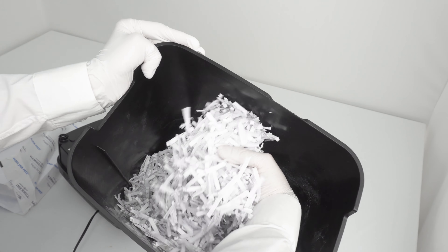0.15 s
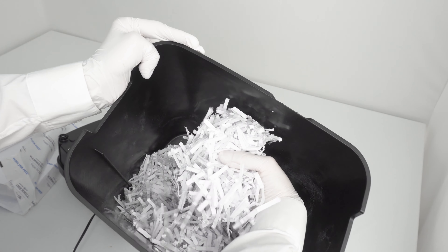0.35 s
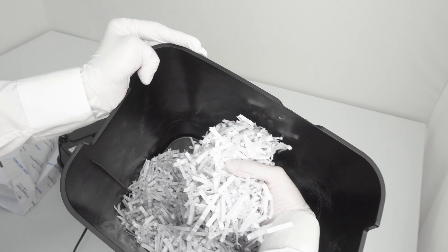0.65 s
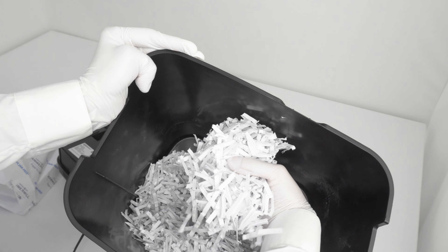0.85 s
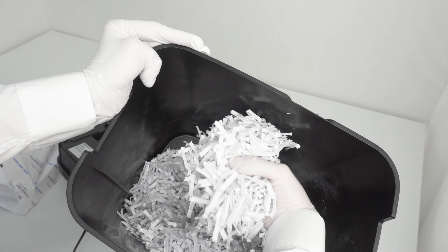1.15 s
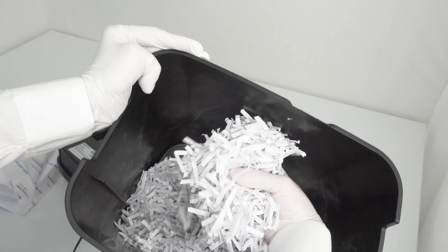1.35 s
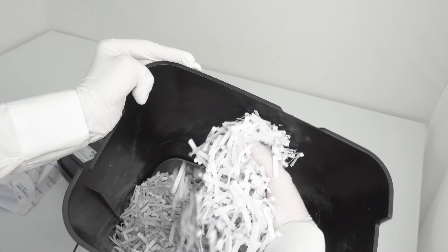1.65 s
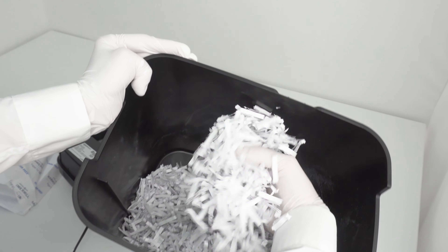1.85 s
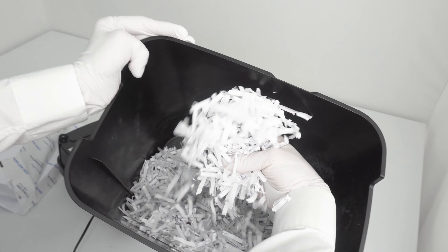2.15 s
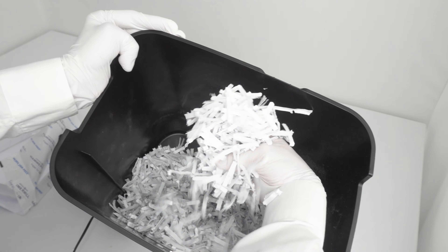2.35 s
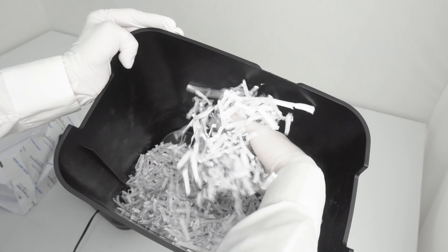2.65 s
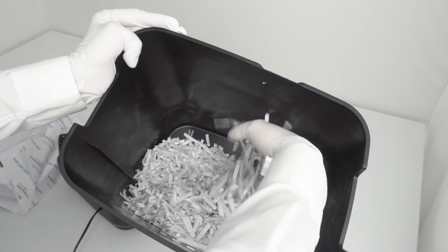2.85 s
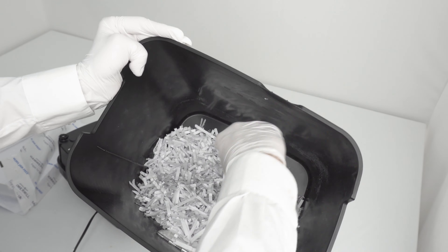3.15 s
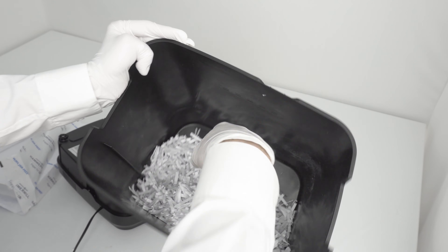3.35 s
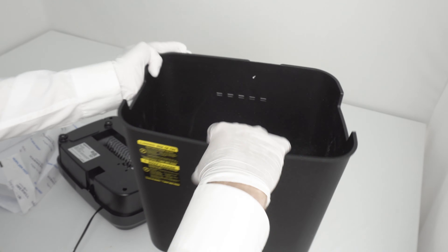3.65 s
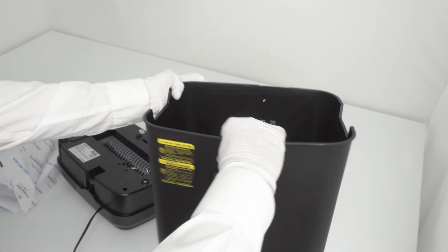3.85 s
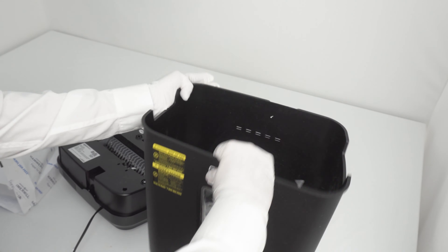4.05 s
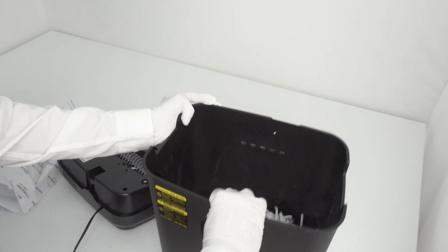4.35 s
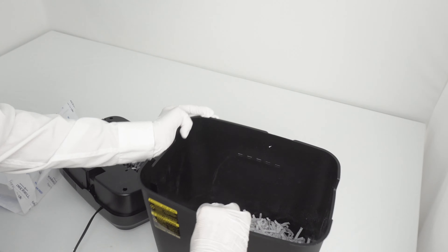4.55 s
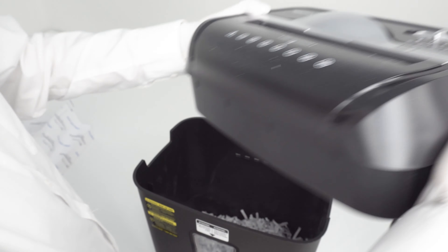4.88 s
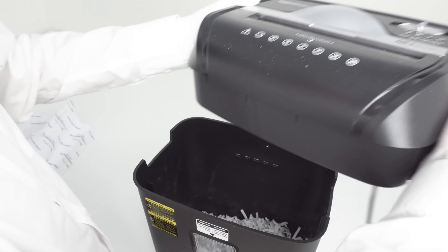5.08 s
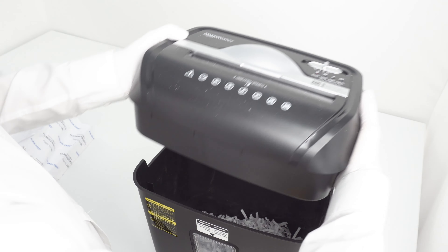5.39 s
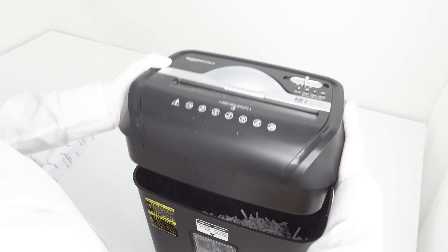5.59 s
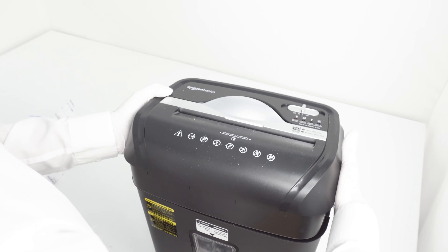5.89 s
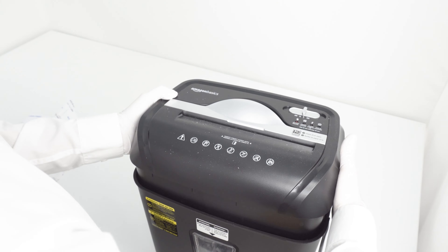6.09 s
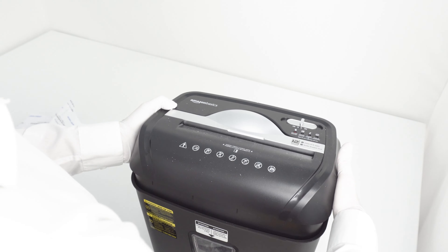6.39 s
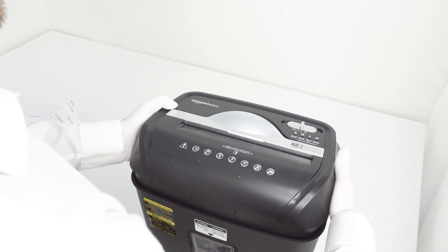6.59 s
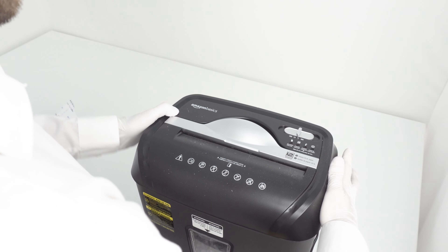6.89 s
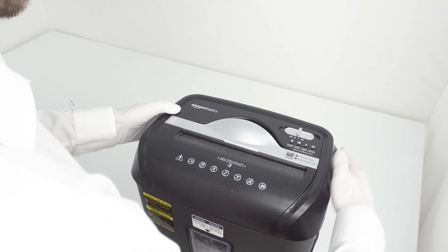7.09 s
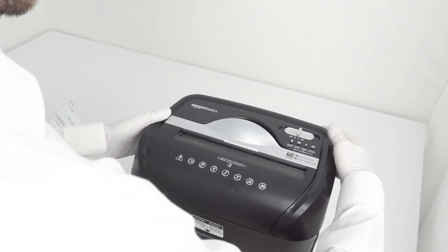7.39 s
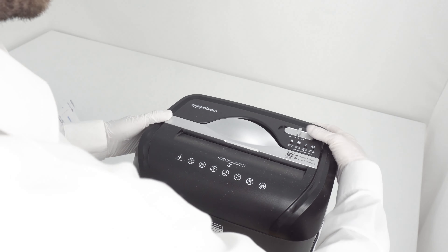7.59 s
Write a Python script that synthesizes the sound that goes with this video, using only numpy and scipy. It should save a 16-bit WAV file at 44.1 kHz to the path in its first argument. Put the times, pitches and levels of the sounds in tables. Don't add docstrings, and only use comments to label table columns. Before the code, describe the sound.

Bright, dry paper crackle comes in flurries inside a hollow plastic bin, with small ticks and dull knuckle knocks. After about four seconds the shreds slide in a louder rush, rims clack, plastic creaks and the bin thumps down. A heavy plastic unit is fitted on top in clusters of low knocks and short rubs, ending in a firm snap. Close miking, short bright room ring, faint hiss.

```python
import sys
import numpy as np
from scipy import signal
from scipy.fft import rfft, irfft, next_fast_len
from scipy.io import wavfile
from scipy.ndimage import uniform_filter1d

SR = 44100
rng = np.random.default_rng(int(sys.argv[2]) if len(sys.argv) > 2 else 0)


def boost_factor(decibels):
    exponent = np.asarray(decibels, float) / 20
    return 10 ** exponent


def output_pcm(signal):
    pcm = np.clip(np.atleast_2d(signal).T, -1, 1) * 32767
    wavfile.write(sys.argv[1], SR, np.round(pcm).astype(np.int16))


N = 340893
TIME = np.arange(N) / SR

# frequency in Hz, level in dB, t60 in seconds.
BIN_MODES = [(184.5, -3, 0.15), (199, -2.5, 0.32), (237, 3, 0.12), (280, 4.5, 0.099), (300, 4, 0.031),
             (342, -0.5, 0.084), (372, 1, 0.086), (416.5, 2, 0.069), (474, -1, 0.064), (551, -4, 0.073),
             (596, -3, 0.068), (668, -1.5, 0.072), (786, -10.5, 0.092), (834, -11, 0.092)]
# frequency in Hz, level in dB, t60 in seconds.
TABLE_MODES = [(39.9, -1.5, 0.5), (65.9, 11, 0.23), (102.7, 7.5, 0.17), (125.2, 13.5, 0.14)]


def unit(x):
    return x / np.sqrt(np.mean(x ** 2))


def colour(x, curve, share=1):
    hz, db = np.transpose(curve)
    length = x.shape[-1]
    size = next_fast_len(length)
    bins = np.log(np.arange(size // 2 + 1) * SR / size + 1)
    gain = boost_factor(share * np.interp(bins, np.log(hz), db))
    return irfft(rfft(x, size) * gain, size)[..., :length]


def band(x, lo_hz, hi_hz, order=2):
    return signal.sosfilt(signal.butter(order, [lo_hz, hi_hz], "band", fs=SR, output="sos"), x)


def walk(rate):
    hold = int(SR / rate)
    levels = rng.standard_normal(N // hold + 1)
    return uniform_filter1d(np.repeat(levels, hold), hold)[:N]


def rings(modes, size=22050):
    hz, db, t60 = np.transpose(modes)[:, :, None]
    t = TIME[:size]
    return boost_factor(db - 60 * t / t60) * np.sin(2 * np.pi * hz * t)


def add(out, s, x):
    i = int(s * SR)
    out[..., i:i + x.shape[-1]] += x[..., :N - i]


def add_peak(out, s, db, x):
    add(out, s, boost_factor(db) * x / abs(x).max())


def spread(mid, side, db, share=0.55):
    # frequency in Hz, side minus mid in dB.
    width = [(60, -23), (110, -21), (380, -15), (700, -9), (1290, -8), (4400, -5), (8120, -4), (15000, -4)]
    return mid + boost_factor(db) * colour(side, width, share) * np.array([[1], [-1]])


def grains(scatter_db, flicker_db, rate):
    scatter = np.minimum(rng.exponential(size=(2, N)), 6)
    size = boost_factor(scatter_db * scatter + flicker_db * walk(rate))
    return rng.standard_normal((2, N)) * size


def gestures(moves):
    power = np.zeros((2, N))
    for s, db, swell, fade, linked_db in moves:
        rise = (s - TIME) / max(swell, .02)
        fall = (TIME - s) / max(fade, .005)
        away = np.where(TIME < s, rise, fall)
        power += boost_factor(2 * np.array([[db], [db + linked_db]])) * 10 ** -away
    return np.sqrt(power)


def paper():
    # peak time in seconds, crackle level in dB,
    # swell and fade in seconds per 10 dB, heap body minus crackle in dB.
    stirs = [(.06, -35.5, -2, 0, -10.5), (.24, -42.5, 6.5, .5, -5.5), (.53, -47, -0.5, 0.1, -11),
             (.7, -49, -1.2, 0.16, -15), (.98, -49.5, 0, 0.13, -5.5), (1.36, -45, 0.26, 1.1, -8.5),
             (1.52, -37.5, 0.16, 0.78, -8.5), (1.83, -43, 0.14, 0.28, -5), (2.08, -36, 0.05, 0, -6),
             (2.22, -36, 0.25, 0.14, -9), (2.42, -43.5, 0.57, 0.07, -10), (2.7, -38.5, 0.2, 0.02, -15),
             (2.91, -32, 0.09, 0.13, -13), (3.06, -41, 0.3, -0.23, -5), (3.65, -51, -0.5, 0.8, -13),
             (3.8, -43.5, -0.31, 0.29, -8), (3.97, -32.5, 0.0371, 0.0766, -2.5),
             (4.06, -43, 0.06, 0.1239, -1.5), (4.13, -26.5, 0.0679, 0.0485, -5.5),
             (4.32, -33, -0.09, -0.0027, -2), (4.43, -40.5, 0.2, 0.08, -0.5), (4.68, -53, 0.27, 0.37, 4),
             (5.03, -54.5, 1.06, 0.32, -1), (5.24, -54.5, -0.3, 0.23, 4.5), (5.435, -50.5, -0.5, 0.14, 0)]
    slides = [(5.32, -64, 0.011, 0.057, 24), (5.972, -68.5, 0.034, 0.079, 39.5),
              (6.422, -52.5, 0.093, 0.052, 8), (6.723, -58.5, 0.21, .1, 6), (6.896, -45.5, 0.092, 0.063, 9),
              (7.148, -58.5, 0.16, 0.089, -1.5), (7.6, -68, 1.5, 1.5, -17)]
    # frequency in Hz, level in dB per Hz.
    crackle_curve = [(2350, -7.5), (4000, -3.5), (5920, -4.5), (13200, -2.5), (15000, -4), (16200, -9),
                     (16500, -46)]
    # frequency in Hz, level in dB per Hz.
    heap_curve = [(530, -41), (900, -4.5), (1250, 2), (1460, 4), (2180, 5.5), (6000, -10), (7800, -37),
                  (13200, -120)]
    crackle_gain, heap_gain = gestures(stirs + slides)
    crackle = unit(colour(grains(3.3, 1.58, 70), crackle_curve)) * crackle_gain
    muffled = colour(grains(3.0, 2.0, 90), heap_curve)
    heap = unit(band(muffled, 780, 9700)) * heap_gain
    return spread(*(crackle + heap), -3.0)


def knocks():
    # start in seconds, peak in dB, strongest ring in Hz, hardness in dB.
    knuckles = [(0.065, -35, 262, -11), (0.255, -32, 253, -3.5), (0.434, -31.5, 292, -6.5),
                (0.715, -47, 244, -19.5), (1.817, -36.5, 236, -12.5), (1.879, -28.5, 625, -5),
                (1.956, -29.5, 298, -2.5), (2.4, -36, 265, 0.5), (2.686, -31.5, 393, 0.5),
                (2.806, -42.5, 260, 1.5), (2.937, -22.5, 237, -12), (3.015, -24, 259, -3.5),
                (3.153, -40, 450, 2), (3.228, -27, 280, -8.5)]
    # start in seconds, peak in dB, strongest ring in Hz,
    # hardness in dB, table thump in dB.
    bumps = [(3.647, -28.5, 204, -26, -0.5), (3.825, -37, 282, -20, -13), (3.885, -27, 275, -14, -12),
             (4.005, -26.5, 271, -1.5, -32), (4.077, -25, 298, -5, -38), (4.12, -17.5, 270, -8, -29),
             (4.284, -27.5, 556, -7.5, -25), (4.433, -19, 300, -1.5, -29), (4.563, -7.5, 300, -15, -21),
             (4.595, -8.5, 325, -19, -16), (4.621, -17.5, 345, -23, -13), (4.648, -20.5, 382, -9, -20),
             (4.678, -9.5, 330.4, -18.5, -27), (4.687, -11.5, 206, -21, -18), (4.738, -21, 312, -24, -20),
             (4.765, -22.5, 300, -28, -11), (4.824, -28, 207, -18, -17), (4.895, -42, 199, -2, -22),
             (5.309, -13, 268, -30, -33), (5.346, -24.5, 237, -23, -23), (5.418, -30, 280, -24, -23)]
    seats = [(5.957, -8, 214.6, -12, -17.5), (5.969, -12, 280, -12.5, -16), (5.989, -16, 415, -23, -6),
             (6.042, -9, 199, -14, -14), (6.054, -11.5, 397, -16, -17), (6.103, -14.5, 280, -24, -10),
             (6.128, -18, 318, -30, -10), (6.167, -14.5, 199, -13.5, -23), (6.224, -21, 213, -12, -17),
             (6.276, -24.5, 220, 0, -2), (6.32, -19, 199, -17, -6.5), (6.381, -22, 193, -15, -12),
             (6.486, -33.5, 203, -16, -7), (6.594, -29.5, 214, -19, -10), (6.637, -31, 151, -22, -9),
             (6.664, -35, 180, -28, -8), (6.767, -16.5, 300, -13.5, -14), (6.795, -20.5, 331, -26, -11),
             (6.859, -7, 396, -5.5, -14), (6.874, -10.5, 280, -8, -19), (6.894, -8.5, 234, -8, -12),
             (6.917, -12.5, 369, -11, -9), (6.943, -9, 202, -15, -14.5), (6.972, -23, 270, -11, -14),
             (7.0, -20, 324, -10, -11)]
    knuckle_thump_db, rattle_s = -25, 0.026
    blows = [(*k, knuckle_thump_db) for k in knuckles] + bumps + seats

    out, t = np.zeros(N), TIME[:8192]
    table_ring = [1, -1, 1, -1] @ rings(TABLE_MODES, size=50000)
    modes = np.array(BIN_MODES)
    hz = modes[:, 0]
    for s, db, ring_hz, hard_db, thump_db in blows:
        chance = rng.standard_normal((2, len(hz)))
        judder = rng.standard_normal((2, len(t)))
        push = 0.036 * judder[0] * np.exp(-t / rattle_s)
        push[0] = 1
        detune = np.stack([1 + 0.027 * chance[0], hz ** 0, hz ** 0], axis=1)
        walls = rings(modes * detune, size=len(t))
        near_db = 11.8 * np.exp(-(np.log(hz / ring_hz) / 0.12) ** 2)
        wall_ring = (np.sign(chance[1]) * boost_factor(near_db)) @ walls
        body = band(signal.fftconvolve(push, wall_ring), 122, 1800)
        decay = np.exp(-t / (0.81 * rattle_s)) + 0.48 * np.exp(-t / 0.00057)
        hard = band(judder[1] * decay, 386, 1470)
        thump = band(signal.fftconvolve(push, table_ring), 28, 270)
        spot = rings([(ring_hz, 0, .14)], size=len(t))[0]
        add_peak(out, s, db - 6.0, spot)
        add_peak(out, s, db - 3.5, body)
        add_peak(out, s, db + hard_db + 0.7, hard)
        add_peak(out, s, db + thump_db + 1.5, thump)
    return out


def tap():
    # frequency in Hz, level in dB, t60 in seconds.
    casing = [(425, -11, 0.17), (690, -11, 0.069), (846, -4, 0.11), (1130, -4, 0.07), (1220, -7, 0.08),
              (1580, -7, 0.06), (1920, -12, 0.11)]
    out = np.zeros(N)
    ring = (-1) ** np.arange(len(casing)) @ rings(casing)
    add_peak(out, 7.6725, -32, ring)
    return out


def clacks():
    # start in seconds, peak in dB,
    # centre in Hz, length in seconds.
    flicks = [(0.2533, -17, 2400, 0.0072), (0.408, -28, 1290, 0.012), (0.504, -20, 10700, 0.0011),
              (0.527, -33.5, 1300, 0.0072), (1.562, -26, 3000, .003), (1.618, -24, 3000, .002),
              (1.652, -33, 2950, .003), (1.787, -26.5, 3000, .003), (2.02, -25, 2600, 0.025),
              (1.88, -16.5, 2400, 0.0035), (1.947, -22.5, 1290, 0.012), (2.618, -29.5, 1320, .006),
              (2.629, -21.5, 3300, 0.006), (2.636, -23, 4270, 0.0033), (2.686, -23, 3170, 0.01),
              (2.87, -24.5, 2080, 0.014), (2.987, -20.5, 2250, 0.0098), (3.052, -27, 2000, 0.0082),
              (3.064, -17.5, 1960, 0.016), (3.212, -29.5, 2120, 0.0076), (3.227, -26, 1750, 0.0033),
              (3.651, -38, 1210, 0.02)]
    rims = [(3.982, -14.5, 2090, 0.0094), (4.07, -15.5, 2200, 0.071), (4.393, -32, 4730, .004),
            (4.432, -21, 2300, 0.0096), (4.528, -29, 3500, 0.0068), (4.561, -29, 1700, 0.014),
            (4.675, -31, 1900, 0.0073), (4.982, -28, 1800, 0.0049), (5.304, -20, 1510, 0.0059),
            (5.752, -47, 1930, 0.03), (5.907, -49, 1890, 0.01), (5.94, -51, 1930, 0.012),
            (5.94, -41, 1910, .012), (5.948, -26, 1890, 0.014), (5.959, -23.5, 2030, 0.033),
            (6.04, -29, 1700, 0.009), (6.162, -16, 1250, 0.0057), (6.277, -18, 1230, 0.0087),
            (6.395, -37, 1490, .01), (6.766, -30.5, 2270, 0.01), (6.8, -39, 1450, 0.014),
            (6.857, -14, 1530, 0.01), (6.8717, -7, 1690, 0.011), (7.674, -36, 2400, 0.01)]
    flick_tick_db, flick_edge_db = -5, -39
    rim_tick_db, rim_edge_db = -35, -50
    hits = [(*c, flick_tick_db, flick_edge_db) for c in flicks]
    hits += [(*c, rim_tick_db, rim_edge_db) for c in rims]

    out, t = np.zeros(N), TIME[:8192]
    for s, db, hz, length, tick_db, edge_db in hits:
        decay_s = np.array([[max(length, .001)], [.006], [.0004]])
        burst = rng.standard_normal((3, len(t))) * np.exp(-t / decay_s)
        tone = band(burst[0], hz / 1.6, hz * 1.8, order=1)
        edge = band(burst[1], 4500, 19500, order=1)
        tick = band(burst[2], hz / 2.2, min(hz * 2.5, 19500), order=1)
        ring = rings([(hz, 0, .02)], size=len(t))[0]
        add_peak(out, s, db - 17.0, ring)
        add_peak(out, s, db - 4.0, tone)
        add_peak(out, s, db + edge_db + .5, edge)
        add_peak(out, s, db + tick_db, tick)
    return out


def squeaks():
    # start in
    # seconds, length in seconds, first pitch in Hz, last pitch in Hz, level in dB.
    clear = [(3.245, .055, 2620, 2570, -52), (3.29, .05, 2480, 2400, -58), (5.39, .11, 2960, 3010, -51),
             (5.51, .03, 3000, 3000, -58), (5.43, .08, 6150, 5750, -61), (5.23, .065, 3200, 2500, -54),
             (3.755, .05, 2980, 2980, -60), (0, .26, 104, 108, -45), (.29, .16, 106, 112, -43),
             (.2, .05, 650, 560, -52), (.215, .03, 1050, 1150, -53)]
    rough_tones = [(.32, .075, 2760, 2860, -44), (.32, .065, 1380, 1400, -52), (5.2, .09, 450, 390, -51),
                   (7.15, .57, 42, 40, -54), (.27, .07, 2000, 2550, -52), (3.5, .14, 290, 285, -57),
                   (3.7, .3, 280, 285, -49), (4.0, .13, 285, 285, -39), (4.112, .095, 290, 285, -27),
                   (4.435, .08, 290, 300, -35), (5.305, .1, 275, 240, -31), (5.39, .07, 260, 290, -41),
                   (6.17, .12, 205, 200, -31), (3.868, .055, 82, 76, -33)]
    clear_rough, tone_rough = .09, .5
    slips = [(*q, clear_rough) for q in clear] + [(*q, tone_rough) for q in rough_tones]

    out, waver = np.zeros(N), np.array([walk(150), walk(72)])
    for s, length, first_hz, last_hz, db, rough in slips:
        size = int(length * SR)
        pitch, strength = rough * waver[:, int(s * SR):][:, :size]
        hz = np.linspace(first_hz, last_hz, size) * (1 + .05 * pitch)
        phase = 2 * np.pi * np.cumsum(hz) / SR
        level = boost_factor(db + 3 + 3.5 * strength) * np.sqrt(np.hanning(size))
        add(out, s, level * np.sin(phase))
    return out


def drag():
    # peak time in seconds, wall rub in dB,
    # swell and fade in seconds per 10 dB, rim rub minus wall in dB.
    rubs = [(.01, -43.5, .1, 0.26, -1.5), (.9, -55.5, 6.9, 8.0, -5.5), (2.07, -42.5, 0.3, 0.24, -1),
            (3.05, -58.5, 0.86, 0.52, 8), (3.85, -44, 0.074, 0.33, -21.5), (4.11, -32.5, 0.12, 0.15, 1),
            (4.48, -40, 0.29, 0.54, 2), (4.72, -33.5, 0.3, 0.045, 1), (4.99, -54, 0.065, 0.4, 1),
            (5.23, -43.5, 0.12, 0.086, -9), (5.45, -46, 0.11, 0.13, -1), (5.98, -31, 0.033, 0.087, 4),
            (6.13, -25, 0.11, 0.053, -24), (6.22, -39, 0.045, 0.2, -9), (6.42, -37, 0.11, .05, 0),
            (6.65, -48, 0.3, 0.17, -3), (6.8, -33, 0.098, .1, -5.5), (6.93, -35, 0.06, 0.091, -4),
            (7.06, -49, 0.045, .25, -4.5)]
    # peak time in seconds, top hum in dB,
    # swell and fade in seconds per 10 dB, leg rumble minus top in dB.
    loads = [(.1, -49, .3, 0.95, 0), (1.01, -63, 0.48, 0.39, 7.5), (1.5, -61.5, 5.0, 8.0, 0.5),
             (1.78, -61, 0.25, .3, 12), (2.07, -54, 0.56, 0.72, -17.5), (3.85, -61, 0.23, 0.45, 17.5),
             (4.7, -37.5, 0.051, 0.13, -13), (4.84, -58, .2, .12, 15), (4.99, -50.5, .1, 0.44, -12),
             (5.57, -56, 0.25, 0.51, 5), (6.13, -36, 0.083, 0.14, -10), (6.44, -60, 0.35, 0.23, 8.5),
             (6.78, -36, 0.093, .15, -15), (6.93, -38, .1, .07, -4), (7.06, -60, .1, 0.36, 16.5)]
    wall_gain, rim_gain = gestures(rubs)
    top_gain, leg_gain = gestures(loads)
    rub = rng.standard_normal((3, N)) * boost_factor(4.0 * walk(25) - 1.5)
    table = rings(TABLE_MODES)
    wall_ring = (-1) ** np.arange(len(BIN_MODES)) @ rings(BIN_MODES)
    wall = band(signal.fftconvolve(rub[0], wall_ring)[:N], 236, 448)
    wall = unit(wall) * wall_gain * boost_factor(-3.0)
    rim = unit(band(grains(1.8, 6.5, 40), 463, 946)) * rim_gain * boost_factor(-3.5)
    top = unit(signal.fftconvolve(rub[1], table[2] - table[3])[:N]) * top_gain * boost_factor(-1.7)
    leg = unit(signal.fftconvolve(rub[2], table[0] - table[1])[:N]) * leg_gain * boost_factor(-5.5)
    return wall + spread(*rim, 0.69) + top + leg


def room(x, db):
    # centre in Hz, t60 in seconds, level in dB.
    ranges = [(150, 0.35, -4.5), (593, 0.4, 1), (2400, 0.46, 1), (9050, 0.4, -0.5)]
    t, tail = TIME[:30000], 0
    build_up = 1 - np.exp(-t / 0.0018)
    for hz, t60, range_db in ranges:
        bell = [(hz / 4, -40), (hz / 2, -3), (hz, 0), (hz * 2, -3), (hz * 4, -40)]
        noise = colour(rng.standard_normal((2, len(t))), bell)
        tail = tail + noise * boost_factor(range_db - 60 * t / t60) * build_up
    tail = tail / np.sqrt((tail[0] ** 2).sum())
    mid, side = signal.fftconvolve(x[None], tail)[:, :N]
    return boost_factor(db) * spread(mid, side, 3.8, share=1.31)


def air():
    # frequency in Hz, level in dB per Hz.
    tone_curve = [(15, -34), (25, -12), (108, 0), (368, -2), (433, -24), (1220, -15.5), (1470, -15),
                  (3230, -23), (12900, -28), (15200, -29), (16500, -39)]
    noise = unit(colour(rng.standard_normal((2, N)), tone_curve))
    mid, side = noise * boost_factor(-58 + 0.39 * walk(2.3))
    return spread(mid, side, 1.0)


def scene():
    boom, edges, chirps = knocks() + tap(), clacks(), squeaks()
    tails = room(boom, -5.0) + room(edges, -3.5)
    edges = edges * boost_factor(np.array([[-.5], [.5]]) * 3.4)
    return paper() + drag() + boom + edges + chirps + tails + air()


def band_limit(x):
    return signal.sosfilt(signal.butter(12, 15950, fs=SR, output="sos"), x)


def record(dry):
    # frequency in Hz, left minus right in dB.
    lean = [(60, 0.0), (380, 0.0), (700, -0.5), (1290, -1.5), (2380, -2.0), (4400, -1.0), (8120, 0.0),
            (15000, -1.0)]
    heard = np.array([colour(dry[0], lean, share=.5), colour(dry[1], lean, share=-.5)])
    top_cut = signal.ellip(14, .1, 90, 15950, fs=SR, output="sos")
    return band_limit(signal.sosfilt(top_cut, heard))


dry = scene()
out = record(dry)
output_pcm(out)
```